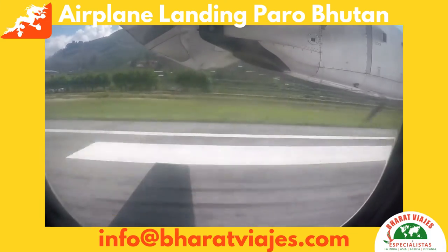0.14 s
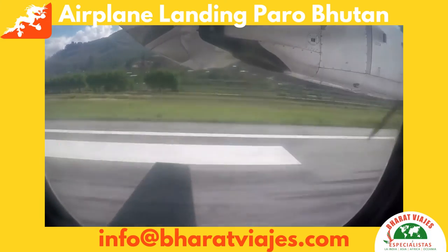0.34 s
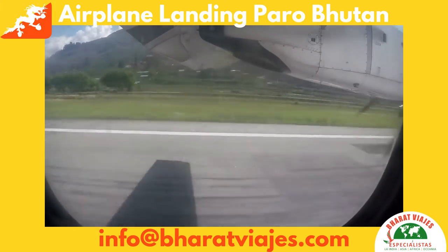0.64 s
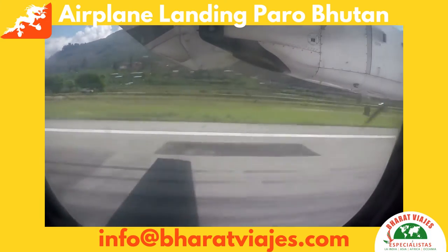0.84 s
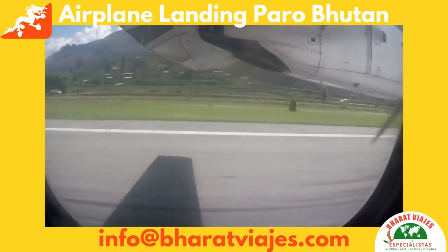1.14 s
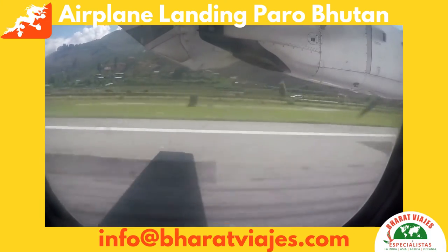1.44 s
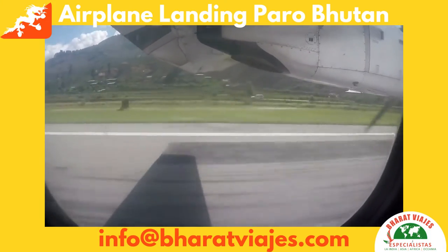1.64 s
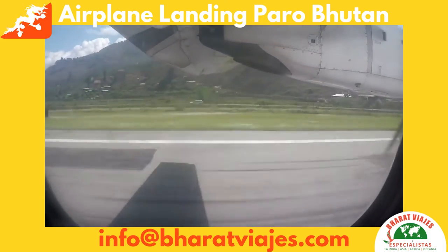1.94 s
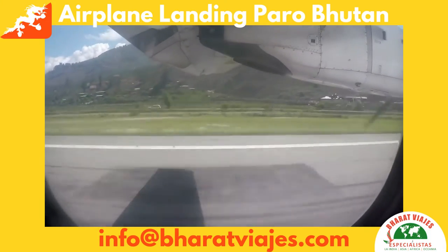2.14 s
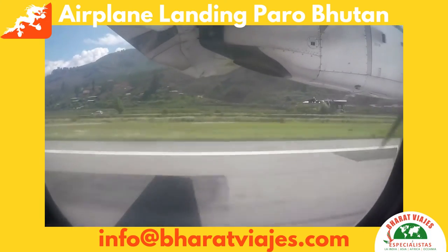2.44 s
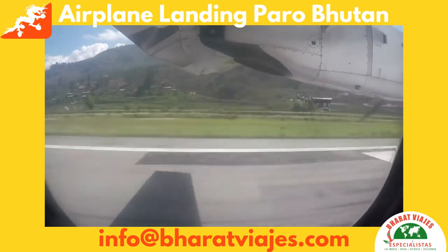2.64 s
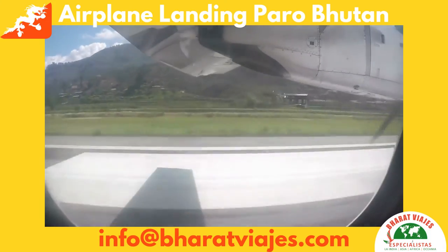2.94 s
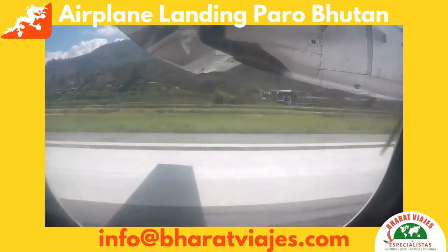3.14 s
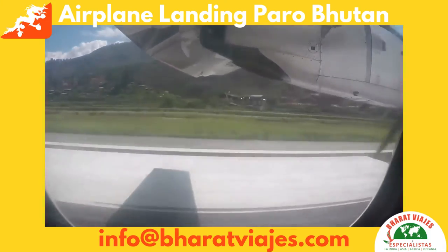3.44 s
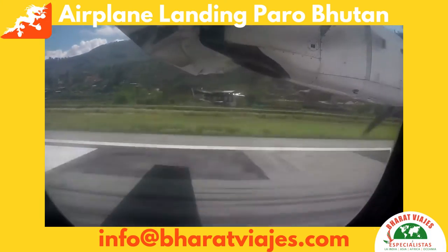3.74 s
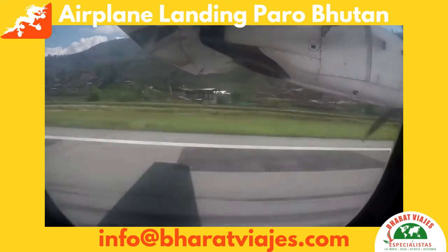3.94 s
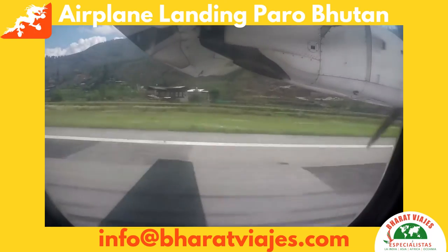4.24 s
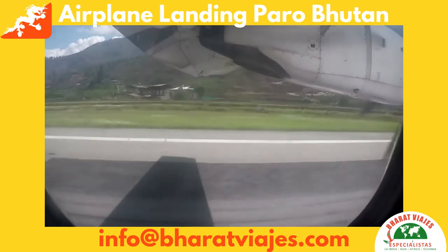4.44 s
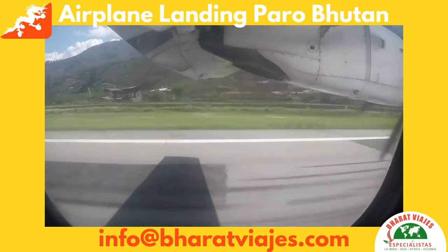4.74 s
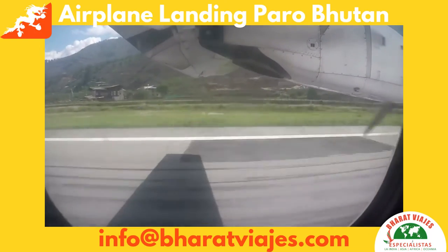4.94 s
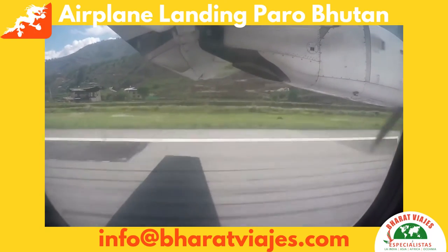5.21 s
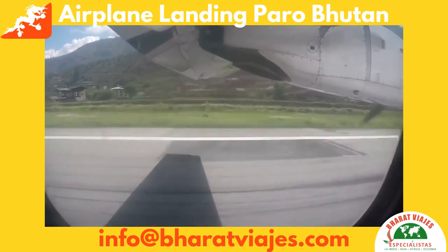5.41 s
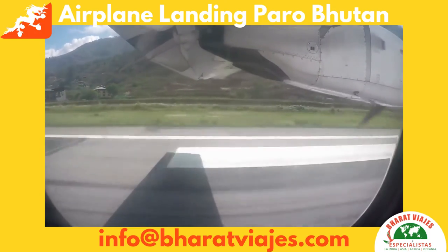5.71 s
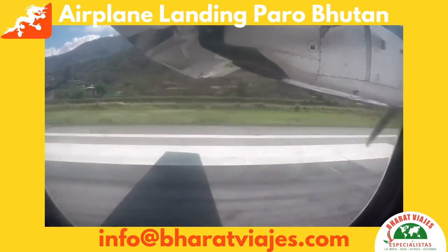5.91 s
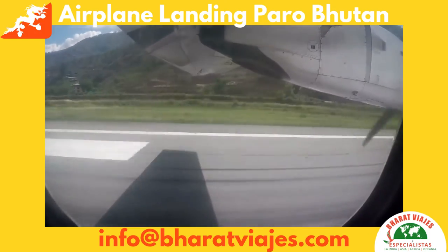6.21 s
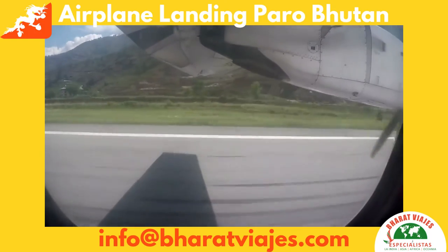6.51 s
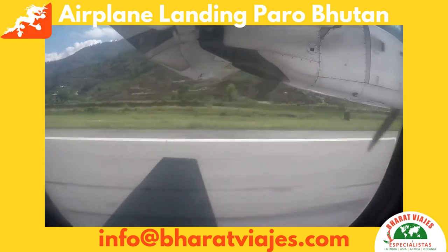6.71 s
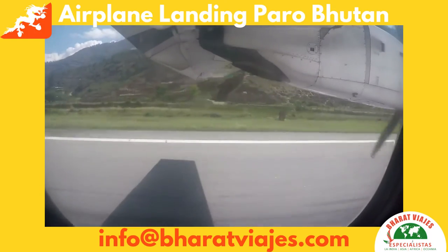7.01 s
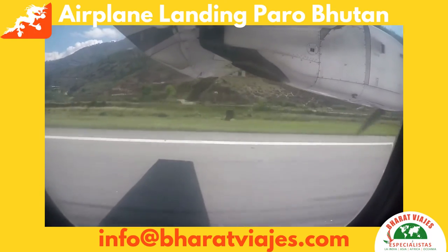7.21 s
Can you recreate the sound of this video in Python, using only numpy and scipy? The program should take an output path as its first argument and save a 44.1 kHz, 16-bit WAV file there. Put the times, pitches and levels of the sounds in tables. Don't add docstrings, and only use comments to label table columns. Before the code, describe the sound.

Heard by a camera leaning on an aircraft window: muffled low air rumble and propeller drone, then touchdown with a soft heavy thud. Runway roar takes over with a slowly falling wheel hum, clumps of trim rattle, and small latch knocks, one with a bright ping. Midway comes a fast hard clatter against the pane, later single cracks, then mostly rough rolling and rushing air.

```python
import sys
import numpy as np
from scipy import signal
from scipy.fft import rfft, irfft
from scipy.io import wavfile

SR = 44100
rng = np.random.default_rng(int(sys.argv[2]) if len(sys.argv) > 2 else 0)


def transcribe(u):
    v = np.clip(np.atleast_2d(u).T, -1, 1)
    q = np.round(v * 32767).astype(np.int16)
    wavfile.write(sys.argv[1], SR, q)


def natural_amplitude(level_db):
    exponent = np.asarray(level_db, float) / 20
    return 10 ** exponent


N = 324576
TIME_S = np.arange(N) / SR
TOUCHDOWN_S = 1.545

# [t/s, level/dB about its mean]
RUNWAY_SHAKE = [(1.55, -4.5), (1.75, -0.5), (2.1, -3.5), (2.5, -2.5), (2.65, -7), (2.95, 0), (3.3, -2.5),
                (3.55, 2.5), (3.9, 1.5), (4.3, 1), (4.65, 4), (4.95, 0.5), (5.5, 0.5), (6.05, 2), (6.4, -1),
                (6.7, 0), (7.0, -0.5), (7.36, -0.5)]
# [t/s, level/dB over flight idle]
PROPELLER_WASH = [(1.55, 0), (3.0, -0.5), (3.55, 3.5), (3.9, 1.5), (4.3, 4), (4.8, 1.5), (5.05, 0.5),
                  (5.7, 1), (6.2, 4.5), (7.36, 2.5)]
# [f/Hz, level/dB, time to fall 60 dB/s]
PANEL_MODES = [(540, -1, .018), (620, 0, .02), (740, 0.5, 0.015), (870, -8.5, 0.01), (1050, -5, 0.013),
               (1410, -11.5, .014), (1800, -21, .012)]


def in_time(rows):
    s, *columns = np.transpose(rows)
    return [np.interp(TIME_S, s, column) for column in columns]


def rms_one(x):
    return x / np.sqrt(np.mean(x ** 2) + 1e-20)


def drift(rate_hz):
    memory = np.exp(-40 * np.pi * rate_hz / SR)
    noise = rng.standard_normal(N // 20 + 4002)
    slow = signal.lfilter([1], [1, -2 * memory, memory * memory], noise)[4000:]
    return np.interp(np.arange(N) / 20, np.arange(len(slow)), rms_one(slow))


def coloured(colour, lo_hz, hi_hz):
    hz = np.maximum(np.arange(N // 2 + 1) * SR / N, 1)
    points = np.array(colour)
    gain = natural_amplitude(np.interp(np.log(hz), np.log(points[:, 0]), points[:, 1]))
    edges = 1 / np.sqrt((1 + (lo_hz / hz) ** 24) * (1 + (hz / hi_hz) ** 24))
    return rms_one(irfft(rfft(rng.standard_normal(N)) * gain * edges, N))


def clicks(seconds, db):
    out = np.zeros(N)
    out[(np.asarray(seconds) * SR).astype(int)] = natural_amplitude(db)
    return out


def soft(push, cut_hz):
    return signal.sosfilt(signal.butter(4, cut_hz, fs=SR, output="sos"), push + 1e-18)


def struck(push, modes, muted_s=1.0, turn=1):
    t = np.arange(4000) / SR
    ring = np.zeros(len(t))
    for k, (hz, db, t60) in enumerate(modes):
        ring += turn ** k * natural_amplitude(db - 60 * t / t60) * np.sin(2 * np.pi * hz * t)
    mute = 0.073 + 0.77 / (1 + (t / muted_s) ** 12)
    return signal.oaconvolve(push, ring * mute)[:N]


def sine(hz):
    turns = np.cumsum(hz * np.ones(N)) / SR
    return np.sqrt(2) * np.sin(2 * np.pi * (turns + rng.random()))


def swell(s, half_s):
    reach = int(2 * max(half_s, .004) * SR)
    at = np.arange(max(int(s * SR) - reach, 0), min(int(s * SR) + reach, N))
    out = np.zeros(N)
    out[at] = np.exp(-(2 * (at - s * SR) / reach) ** 4)
    return out


def phase_db(levels_db):
    return np.interp(TIME_S, [TOUCHDOWN_S - .01, TOUCHDOWN_S + .01], levels_db)


def rolling_db(curve):
    return in_time(curve)[0] * phase_db((0, 1))


def fits_db():
    # [t/s, half length/s, lift/dB]
    fits = [(1.558, 0.023, 19), (1.686, 0.065, 7.5), (2.12, 0.1, 2.5), (2.544, 0.029, 19.5),
            (2.636, 0.024, 6), (2.734, 0.061, 12), (2.884, 0.052, 12.5), (2.98, 0.0252, -1),
            (3.1, .08, 8.5), (3.26, .06, 1), (2.26, 0.049, 6), (4.38, 0.066, 5), (4.626, 0.082, 1),
            (6.083, 0.03, 8.5)]
    return sum(db * swell(s, half_s) for s, half_s, db in fits)


def hull():
    # [f/Hz, level/dB per Hz]
    hull_colour = [(8.2, -47), (14, 0.5), (32, -7), (59, 6), (70, 0.5), (86, -4.5), (120, -3), (157, -5),
                   (189, -6.5), (255, -17.5), (316, -22), (340, -21.5), (402, -16), (482, -41.5),
                   (520, -25), (680, -64), (1140, -120)]
    # [t/s, half length/s, rumble lift/dB, boom
    # lift/dB]
    heaves = [(.02, 0.16, 3.5, 2.5), (0.388, 0.043, 2, 6), (0.693, 0.02, 9, 2.5), (0.96, 0.056, 4.5, -3.5),
              (1.41, 0.037, 5, 4.5), (1.656, .12, -4, 5), (2.118, 0.028, 5, 1), (2.193, 0.024, 2, 1.5),
              (2.283, 0.038, 5.5, 8), (2.36, 0.061, -0.5, -9), (2.734, 0.061, -14.5, 8),
              (3.443, 0.027, 11, -9), (4.644, 0.11, 2, 3), (4.815, 0.067, 4, -4), (5.373, 0.033, 6.5, -8),
              (5.753, 0.048, 5.5, -3), (6.105, 0.23, 5.5, 2.5), (6.5, 0.026, 3, 2.5),
              (6.56, 0.023, -17, -13), (4.384, 0.12, 0, 5.5), (7.1, 0.28, 5, 3.5)]
    shake_db, wash_db = rolling_db(RUNWAY_SHAKE), rolling_db(PROPELLER_WASH)
    heave_db, boom_heave_db = sum(swell(s, half_s) * [[low_db], [high_db]] for s, half_s, low_db, high_db in heaves)
    rumble = natural_amplitude(phase_db((-26, -20)) + heave_db) * coloured(hull_colour, 6.4, 95)
    boom_db = phase_db((-26, -23)) + boom_heave_db + 0.29 * shake_db
    boom = natural_amplitude(boom_db) * coloured(hull_colour, 95, 213.4)
    drum_db = phase_db((-34, -27.5)) + 0.81 * shake_db + 0.39 * wash_db + 0.088 * fits_db()
    flutter_db = 1.5 * drift(18) + 1.1 * drift(7)
    return rumble + boom + natural_amplitude(drum_db + flutter_db) * coloured(hull_colour, 219.2, 470)


def wheels():
    # [t/s, speed/turns per s]
    wheel_speed = [(1.56, 24.2), (3.0, 23.3), (3.6, 23.0), (5.0, 21.7), (5.8, 20.75), (7.36, 19.35)]
    # [t/s, level/dB]
    wheel_load = [(1.56, 2.5), (2.1, -2.5), (2.3, -10), (2.5, -3.5), (3.15, 0.5), (3.3, -11), (3.45, -2),
                  (3.9, -2), (4.3, -1), (4.8, 1.5), (5.4, -0.5), (5.8, -3.5), (6.1, -3), (6.6, -0.5),
                  (6.85, -5), (7.1, -5), (7.36, -5)]
    # [multiple, level/dB]
    faint_orders = [(1, -25.5), (2, -46.5), (4, -28), (9, -46)]
    # [multiple, level/dB]
    tyre_orders = [(3, -16.5), (5, -19), (6, -17.5)]
    # [f/Hz, width/Hz, level/dB]
    cabin_modes = [(63, 5.7, 0), (116.8, 10.6, 0), (138, 5.55, 1)]
    turn_hz, = in_time(wheel_speed)
    load_db, = in_time(wheel_load)
    hum = sum(natural_amplitude(db + 0.92 * drift(4.1)) * sine(k * turn_hz) for k, db in faint_orders)
    for k, db in tyre_orders:
        lift = np.zeros(N)
        for hz, width_hz, mode_db in cabin_modes:
            lift += natural_amplitude(mode_db) / (1 + (2 * (k * turn_hz - hz) / width_hz) ** 2)
        hum += natural_amplitude(db + load_db + 0.75 * drift(10.0)) * (0.15 + lift) * sine(k * turn_hz)
    spin_up = np.clip((TIME_S - wheel_speed[0][0]) / 0.036, 0, 1)
    return hum * spin_up


def gear_legs():
    # [t/s, f/Hz, level/dB, time to fall 60 dB/s]
    thumps = [(1.563, 57.5, 2.5, 0.19), (1.7, 31.8, -8, 0.17), (2.11, 62, -11, 0.11),
              (2.267, 98.7, -4.5, 0.37), (2.289, 49.6, -15, 0.18), (2.401, 108.6, -4, 0.51),
              (2.449, 220, -7.5, 0.16), (3.418, 63, -17, 0.27), (4.346, 249.5, -9, .1),
              (4.76, 20.3, -9, 0.62), (6.032, 56, -17, 0.39)]
    out = np.zeros(N)
    for s, hz, db, t60 in thumps:
        t = np.maximum(TIME_S - s, 0)
        out += natural_amplitude(db - 60 * t / t60) * (1 - np.exp(-t * hz)) * np.sin(2 * np.pi * hz * t)
    return out


def jolts():
    # [t/s, peak level/dB]
    joints = [(1.554, -39), (1.627, -28), (1.699, -27), (1.764, -31), (2.203, -32), (2.248, -22),
              (2.292, -34), (2.447, -44), (2.607, -23.5), (2.683, -26), (2.721, -21.5), (2.77, -31),
              (2.796, -24), (2.827, -22), (2.855, -21), (3.081, -18), (3.2, -22.5), (4.333, -21),
              (4.385, -20), (4.578, -23)]
    # [t/s, peak level/dB]
    clip_hits = [(1.576, -26), (1.6595, -21), (1.7263, -33), (1.9877, -31), (2.0263, -32), (2.2098, -29),
                 (2.5221, -16), (2.688, -26.5), (2.7341, -30.5), (2.7771, -24), (2.8367, -21),
                 (2.8446, -22), (2.8641, -21), (2.8704, -26), (2.8772, -18), (2.8841, -33), (2.9147, -23),
                 (3.0499, -31), (3.1096, -28), (3.4129, -27), (3.9246, -26), (4.0668, -32), (4.076, -27),
                 (4.0913, -28), (4.1042, -23), (4.2024, -23), (4.2581, -20.5), (4.3156, -27), (4.4006, -23),
                 (4.4781, -27), (4.5304, -29), (4.6736, -31), (4.6828, -26), (4.6972, -20.5), (4.7581, -24),
                 (5.2862, -28), (5.3587, -26), (5.45, -16), (5.6041, -31), (5.7955, -24), (6.0117, -18.5),
                 (6.0194, -26), (6.0722, -27), (6.0829, -25), (6.1007, -31), (6.1203, -24), (6.2337, -29),
                 (6.2622, -31), (6.5399, -25), (6.616, -30), (6.6306, -28), (6.7358, -28), (6.7741, -29),
                 (7.2833, -33), (7.3126, -24.5)]
    s, peak_db = np.transpose(joints)
    hit_s, hit_db = np.transpose(clip_hits)
    spread_db = 5.2 * rng.standard_normal((len(hit_s), len(PANEL_MODES)))
    hits = np.zeros(N)
    for k, mode in enumerate(PANEL_MODES):
        hits += struck(clicks(hit_s + 0.00098, hit_db - 5.5 + spread_db[:, k]), [mode])
    return struck(soft(clicks(s, peak_db - 4.5), 990), PANEL_MODES) + soft(hits, 1100)


def rattle():
    level_db = -50 + 0.98 * rolling_db(RUNWAY_SHAKE) + fits_db()
    sizes = natural_amplitude(5.0 * np.minimum(rng.exponential(1, N), 2.5)) * rng.choice([-1, 1], N)
    born = rng.random(N) < 170 * natural_amplitude(4.0 * drift(18)) / SR
    hits = struck(soft(sizes * born, 1900), PANEL_MODES)
    return natural_amplitude(level_db) * phase_db((0, 1)) * rms_one(hits)


def pane():
    # [t/s,
    # peak level/dB]
    camera_taps = [(3.5643, -16), (3.5699, -12.5), (3.578, -5.5), (3.5873, -11), (3.5966, -7.5), (3.604, -5.5),
                   (3.6127, -9), (3.6392, -6.5), (3.647, -6.5), (3.6575, -14), (3.6734, -5), (3.6826, -11.5),
                   (3.6899, -11.5), (3.7, -8), (3.707, -21),
                   (3.768, -1), (3.773, -26), (3.7811, -22), (3.7956, -9.5), (3.801, -28), (3.848, -19.5),
            (3.8648, -17), (3.8732, -17), (4.826, -14), (4.8579, -18), (4.9584, 2.5), (4.9662, -10),
            (5.0524, -8.5), (5.0605, -13), (5.079, -12.5), (5.274, -20), (5.3516, -9.5), (5.4407, 0),
            (5.4587, -22), (5.4739, -8.5), (5.844, -9), (5.8514, -12), (5.8896, -15.5)]
    # [t/s, peak level/dB]
    thuds = [(1.561, -31), (1.6293, -23), (1.654, -31), (2.4495, -26.5), (2.512, -28), (2.5306, -18),
             (2.721, -30), (2.7436, -25), (2.893, -30), (2.9023, -29), (3.0195, -27), (3.0265, -20),
             (3.086, -27), (3.121, -25.5), (3.1286, -25), (3.1573, -25.5), (3.448, -23), (3.5343, -23),
             (4.1281, -26.5), (4.146, -30.5), (4.2377, -25.5), (4.349, -26), (4.4152, -28), (4.436, -29),
             (4.5429, -24), (4.8451, -21), (5.874, -24), (6.0639, -30), (6.1688, -23), (6.469, -31.5)]
    # [t/s, peak level/dB]
    nudges = [(2.4592, -21.5), (2.4721, -30), (2.4897, -33), (2.5574, -23), (2.7503, -22), (2.759, -29),
              (3.0326, -28), (4.0035, -29), (4.5067, -26), (4.6077, -30), (4.6676, -26), (4.9714, -32),
              (5.2247, -28), (5.2654, -27), (5.6514, -28), (5.6989, -27), (5.9705, -28), (5.9878, -25),
              (6.187, -28), (6.3914, -27), (6.4075, -33), (6.445, -31), (6.4748, -26), (6.6741, -27),
              (6.9553, -36), (7.0006, -27), (7.2249, -31), (7.2625, -26)]
    # [f/Hz, level/dB, time to fall 60 dB/s]
    pane_ring = [(1004, 2.5, 0.037), (670, 2.5, 0.0081), (1270, -21, 0.04)]
    pane_crack = [(1610, -24.5, 0.0074), (2223, -1.5, 0.026), (2630, -10, 0.046), (3090, -1.5, 0.014),
                  (3338, 6, .009), (3850, -11.5, 0.04), (4150, -15, 0.027)]
    pane_edge = [(4320, 3.5, 0.0073), (4970, -5.5, .005), (5500, -8, 0.0046), (5900, -2.5, .007),
                 (7220, -1, 0.0037), (9000, 0, .003), (10100, -1, 0.0026), (12200, -11.5, .003),
                 (14500, -16, .003)]
    frame_tick = [(760, -5, 0.0042), (1480, -2.5, 0.0055), (1900, -8.5, .005)]
    muted_after_s = 0.0039
    s, peak_db = np.transpose(camera_taps)
    lag, spread = rng.random((len(s), 2)).T
    second = clicks(s + .0004 * lag, peak_db - 10.0 - 9 - 6 * spread)
    contact = soft(soft(clicks(s - .0002, peak_db - 8.0) - second, 4700), 5200)
    crack = struck(contact, pane_crack, muted_after_s)
    edge = struck(soft(clicks(s, 2 * peak_db - 20), 11000), pane_edge)
    bump_s, bump_db = np.transpose(thuds + [(at_s + .001, db - 4.0) for at_s, db in nudges])
    late = soft(clicks(s + 0.00078, -5 + 0.68 * peak_db), 2200)
    crack += struck(soft(clicks(bump_s, 1.5 * bump_db - 0.5), 2100), pane_crack, muted_after_s)
    frame_db = 1.3 * bump_db + 3.0 * rng.standard_normal(len(bump_s))
    crack += struck(soft(clicks(bump_s, frame_db), 2600), frame_tick)
    bumps = soft(clicks(bump_s, bump_db + 1.5), 1100)
    return crack + edge + struck(late - bumps, pane_ring, muted_after_s)


def ticks():
    # [t/s, peak level/dB]
    touches = [(1.5525, -25), (1.568, -30), (1.628, -26), (1.654, -28), (2.5306, -27), (2.744, -30.5),
               (3.019, -25), (3.117, -31), (3.157, -31), (4.128, -30), (4.2365, -26), (4.365, -33),
               (4.417, -31), (4.5425, -29), (6.0639, -33), (6.1688, -27)]
    # [f/Hz, level/dB, time to fall 60 dB/s]
    sharp_tick = [(1150, -5.5, .004), (1550, 0.5, .005), (1950, -0.5, .004), (2500, -7, .004)]
    s, peak_db = np.transpose(touches)
    return struck(soft(clicks(s, peak_db - 3.0), 3500), sharp_tick, turn=-1)


def latch():
    # [t/s, peak level/dB, ping level/dB]
    knocks = [
        (1.6794, -11, -40),
        (1.968, -12, -29),
        (3.495, -13.5, -56),
        (3.5145, -23, -65),
        (3.9645, -17, -49.5),
        (6.001, -12, -44),
    ]
    # [f/Hz, level/dB, time to fall 60 dB/s]
    bolt_modes = [(1000, 4, 0.0061), (1397, -2, 0.016), (1730, -1, 0.014), (1866, -14.5, 0.067),
                  (2100, -5.5, 0.005), (2523, -4, 0.015), (3270, -12, 0.012), (4360, -18.5, 0.033)]
    ping_modes = [(4958, 0, .035)]
    spring_edge = [(3600, 0.5, .004), (4200, -2.5, .006), (5700, -5.5, .004), (6850, -2.5, .004),
                   (8800, -12, .003), (11300, -20, .003)]
    spring_lag_s = .0011
    s, peak_db, ping_db = np.transpose(knocks)
    knock = struck(soft(clicks(s - .0001, peak_db + .5), 3220), bolt_modes, turn=-1.0)
    no_bass = signal.butter(2, 700, "high", fs=SR, output="sos")
    knock = signal.sosfilt(no_bass, knock + 1e-18)
    edge_db = .45 * ping_db + 0.51 * peak_db - 12.5
    edge = struck(clicks(s + .6 * spring_lag_s, edge_db), spring_edge, turn=-1)
    return knock + struck(soft(clicks(s + spring_lag_s, ping_db), 7400), ping_modes) + edge


def panel_buzz():
    # [f/Hz, level/dB per Hz]
    panel_colour = [(260, -30), (440, 4.5), (492, -10.5), (533, -5), (646, -7), (710, -1), (817, -16.5),
                    (977, -10), (1160, -7), (1260, -29.5), (1350, -31.5), (1760, -48.5), (2970, -120)]
    buzz_db = phase_db((-46.5, -40.5)) + 0.97 * rolling_db(RUNWAY_SHAKE) + 0.56 * fits_db()
    return natural_amplitude(buzz_db) * coloured(panel_colour, 467.5, 1110)


def scuffs():
    # [t/s, half length/s, hiss lift/dB, air lift/dB]
    rubs = [(1.574, 0.03, 1, 2), (1.726, 0.092, 4, 6.5), (2.1, 0.04, 1.5, 4.5), (2.323, 0.026, 1, 4),
            (2.516, 0.074, 6, 5.5), (2.97, 0.034, 4, 4), (3.587, 0.018, -5, 13), (3.682, 0.018, -1, 12),
            (4.068, 0.029, 3, 5.5), (4.8, 0.074, 5.5, 5.5), (5.61, 0.011, 2.5, 6), (6.204, 0.011, 0.5, 5),
            (6.58, 0.022, 0.5, 0.5), (6.895, 0.021, 1.5, 4.5), (7, 0.029, 0.5, 3.5),
            (7.261, 0.0088, 4.5, 6)]
    return sum(swell(s, half_s) * [[hiss_db], [air_db]] for s, half_s, hiss_db, air_db in rubs)


def window_air():
    # [f/Hz, level/dB per Hz]
    hiss_colour = [(710, -23.5), (1200, 2), (1230, -7.5), (1260, -6.5), (1360, -10), (1550, -6.5),
                   (1920, -11), (2110, -6.5), (2410, -0.5), (2590, -2), (2800, -8.5), (3460, -4.5),
                   (3970, -12), (4510, -23), (5860, -49), (9920, -120)]
    air_colour = [(4300, 8), (4700, 2.5), (5300, 0.5), (6100, -2.5), (6800, -1), (7500, -6.5), (9000, -8.5),
                  (11000, -12.5), (13000, -18.5), (15000, -26), (16300, -41.5)]
    wash_db = rolling_db(PROPELLER_WASH)
    gust_db = phase_db((.3, 1.1)) * drift(30)
    scuff_db, bright_scuff_db = scuffs()
    hiss_db = phase_db((-49.5, -47)) + wash_db + scuff_db + gust_db + 0.52 * drift(60)
    hiss = natural_amplitude(hiss_db) * coloured(hiss_colour, 1220, 4601)
    air_db = phase_db((-69, -66.5)) + .7 * wash_db + bright_scuff_db + 1.4 * gust_db
    return hiss + natural_amplitude(air_db) * coloured(air_colour, 4600, 16000)


def propellers():
    # [f/Hz, level/dB]
    blade_tones = [(62, -36), (139, -29.5)]
    # [f/Hz, level/dB]
    gear_tones = [(1608, -71), (2875, -72), (8630, -95.5)]
    out = np.zeros(N)
    for hz, db in blade_tones:
        out += natural_amplitude(db + phase_db((0, -9)) + 2.3 * drift(2.2)) * sine(hz + 1.7 * drift(4.3))
    return out + sum(natural_amplitude(db + 1.8 * drift(2.5)) * sine(hz) for hz, db in gear_tones)


def converter_whine():
    # [multiple, level/dB]
    whine_orders = [(1, -0.5), (2, -6), (3, -6.5), (4, -32)]
    # [t/s, half length/s, lift/dB]
    surges = [
        (0.163, 0.055, 9),
        (0.474, 0.13, 7.5),
        (1.048, 0.19, 8.5),
        (1.397, 0.091, 8),
        (1.85, 0.071, 5),
        (2.2, 0.16, 3.5),
        (2.8, 0.11, 5.5),
    ]
    fade_db = 1.5 * np.maximum(TIME_S - TOUCHDOWN_S, 0)
    whine_db = -60 - fade_db + sum(db * swell(s, half_s) for s, half_s, db in surges)
    whine_hz = 1196.5 + 1.3 * drift(0.97)
    return sum(natural_amplitude(whine_db + db + 1.4 * drift(4.8)) * sine(k * whine_hz) for k, db in whine_orders)


def mic_hiss():
    colour = [(9000, 0.5), (10800, -1), (11300, -2.5), (11900, 2.5), (16000, -2.5)]   # (f/Hz, level/dB per Hz)
    return natural_amplitude(-82 + 2.5 * drift(20)) * coloured(colour, 10000, 15000)


def scene():
    rolling = wheels() + gear_legs() + jolts() + rattle()
    camera_and_latch = pane() + ticks() + latch()
    steady = panel_buzz() + window_air() + propellers() + converter_whine() + mic_hiss()
    return (hull() + rolling + camera_and_latch + steady)[None]


def roll_off(x):
    return signal.sosfilt(signal.butter(12, 15300, fs=SR, output="sos"), x)


def record(dry):
    fade = np.clip((N - np.arange(N)) / (.004 * SR), .1, 1)
    rounded = .96 * np.tanh(dry / .96)
    top_cut = signal.cheby2(10, 50, 16200, fs=SR, output="sos")
    return roll_off(signal.sosfilt(top_cut, fade * rounded))


dry = scene()
out = record(dry)
transcribe(out)
```